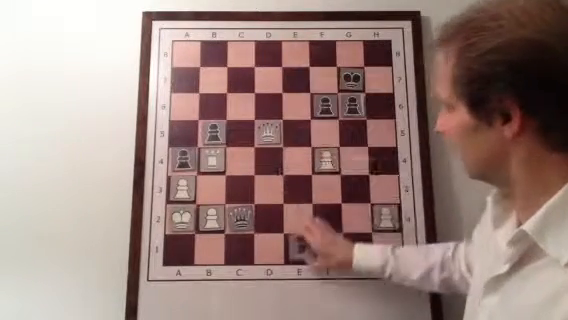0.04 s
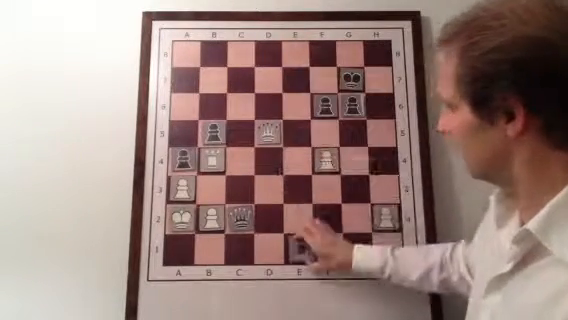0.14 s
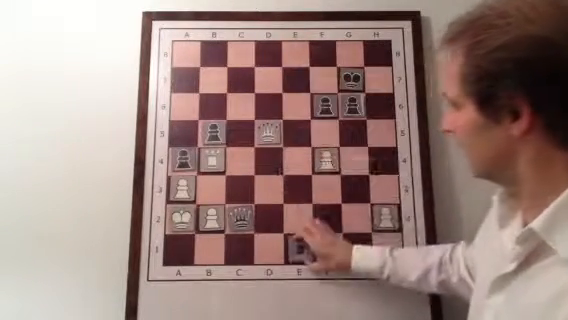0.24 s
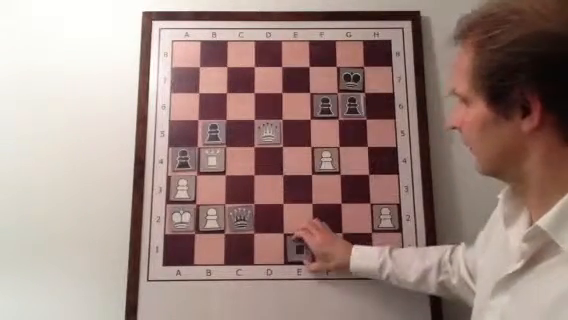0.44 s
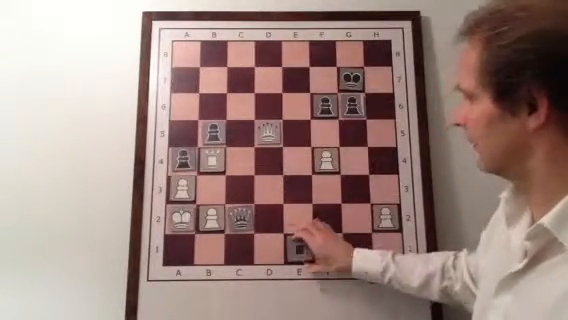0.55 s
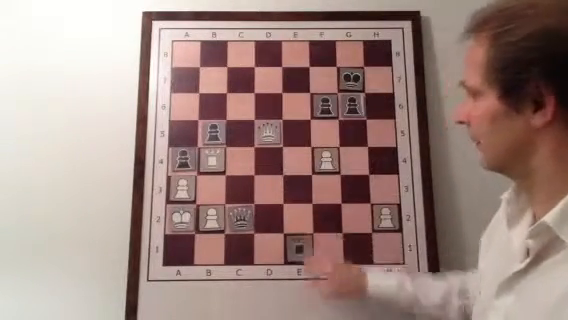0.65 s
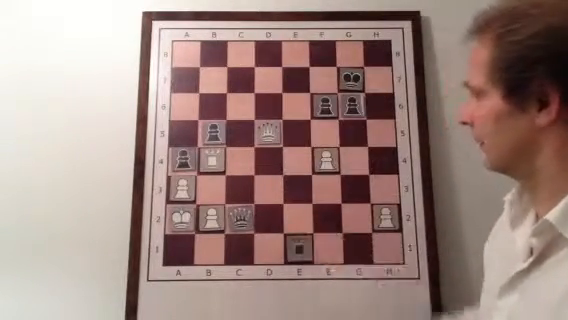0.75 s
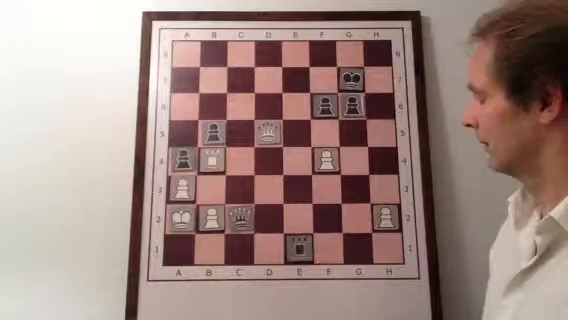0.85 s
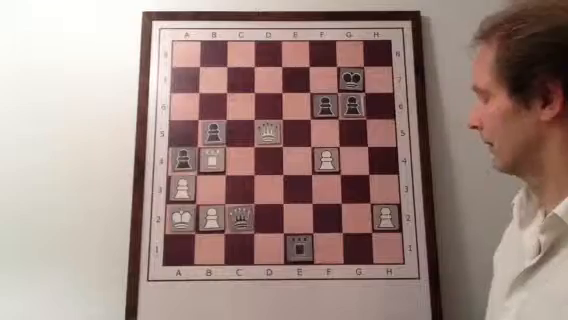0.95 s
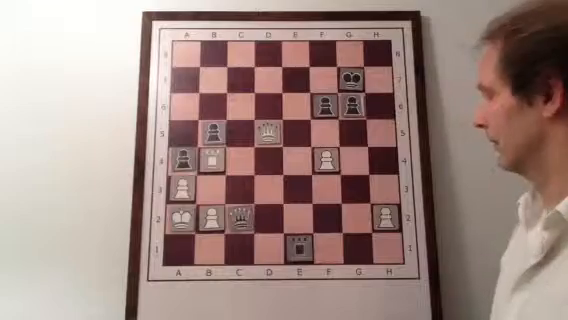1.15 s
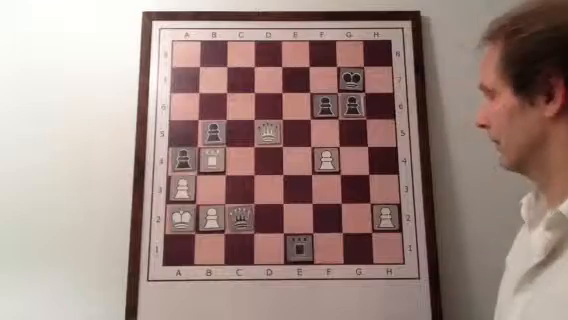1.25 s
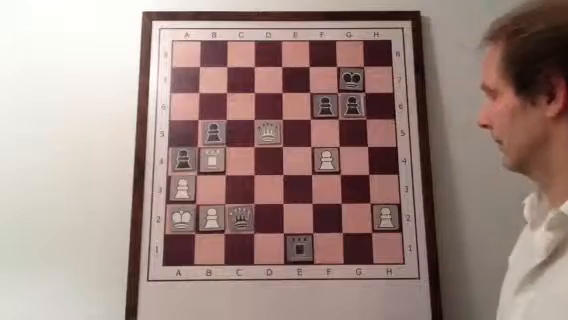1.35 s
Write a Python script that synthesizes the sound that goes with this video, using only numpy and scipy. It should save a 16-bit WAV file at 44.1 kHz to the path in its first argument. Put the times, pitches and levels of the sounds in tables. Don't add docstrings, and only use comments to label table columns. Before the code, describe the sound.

A magnetic game piece clicks sharply onto a thin wall-mounted board with a low hollow knock, then a softer, duller knock as the hand leaves and faint thuds against the wall, close microphone, bare quiet room.

```python
import sys
import numpy as np
from scipy import signal
from scipy.fft import rfft, irfft
from scipy.io import wavfile

SR = 44100
rng = np.random.default_rng(int(sys.argv[2]) if len(sys.argv) > 2 else 0)


def unload_wav(signal):
    wavfile.write(
        sys.argv[1],
        SR,
        np.round(np.clip(np.atleast_2d(signal).T, -1, 1) * 32767).astype(np.int16),
    )


def volts_from_decibels(level):
    exponent = np.asarray(level, float) / 20
    return 10 ** exponent


N = 61739
T = np.arange(N) / SR


def rms_one(x):
    return x / np.sqrt(np.mean(x ** 2) + 1e-20)


def at_hz(points, hz):
    table_hz, value = np.transpose(points)
    return np.interp(np.log(np.maximum(hz, 1)), np.log(table_hz), value)


def coloured(spectrum):
    hz = np.arange(N // 2 + 1) * SR / N
    gain = volts_from_decibels(at_hz(spectrum, hz)) * (hz < spectrum[-1][0])
    return rms_one(irfft(rfft(rng.standard_normal(N)) * gain, N))


def highpass(x, order, hz):
    return signal.sosfilt(signal.butter(order, hz, "high", fs=SR, output="sos"), x)


# time in seconds, level in dB.
RUMBLE_LEVEL = [(0.0, -60), (0.096, -63), (0.59, -63), (0.728, -55.5), (0.778, -55), (0.918, -64),
                (1.4, -65)]
# frequency in Hz, density in dB per Hz.
RUMBLE_COLOUR = [(60, -43), (130, -19), (165, -11.5), (210, 1), (265, -3.5), (340, -7.5), (550, -13.5),
                 (1000, -28.5)]
# frequency in Hz, density in dB per Hz.
HISS_COLOUR = [(25, -17), (85, -15.5), (100, 3), (140, -4), (500, -0.5), (1000, -3), (2000, -7.5),
               (16000, -13)]
HISS_DB, HUM_DB, HUM_HZ = -65.5, -89.5, 100


def background():
    rumble = volts_from_decibels(np.interp(T, *np.transpose(RUMBLE_LEVEL))) * coloured(RUMBLE_COLOUR)
    hum = volts_from_decibels(HUM_DB) * np.sqrt(2) * np.sin(2 * np.pi * HUM_HZ * T)
    return rumble + hum + volts_from_decibels(HISS_DB) * coloured(HISS_COLOUR)


# frequency in Hz, time to fall 60 dB in seconds.
ROOM_DECAY = [(200, 0.25), (500, 0.37), (1000, 0.64), (3500, 0.43), (6000, 0.34), (12000, 0.075)]
ROOM_DB, ROOM_GAP_S, ROOM_BUILD_S = -34, 0.001, 0.002


def room(x):
    age = T[:SR // 2]
    edges = 100 * 2 ** np.arange(0, 7.6, .5)
    tail = np.zeros(len(age))
    for lo, hi in zip(edges, edges[1:]):
        band = signal.butter(2, [lo, hi], "band", fs=SR, output="sos")
        noise = signal.sosfilt(band, rng.standard_normal(len(age)))
        tail += noise * volts_from_decibels(-60 * age / at_hz(ROOM_DECAY, np.sqrt(lo * hi)))
    tail *= 1 - np.exp(-np.maximum(age - ROOM_GAP_S, 0) / ROOM_BUILD_S)
    return volts_from_decibels(ROOM_DB) * signal.fftconvolve(x, tail)[:N]


# centre in seconds, width in seconds, level in dB.
BRUSHES = [
    (.01, 0.037, -69),
    (.408, 0.03, -57),
    (1.165, 0.022, -66.5),
    (1.4, 0.017, -64.5),
]
# frequency in Hz, density in dB per Hz.
CLOTH_COLOUR = [(150, -37), (600, -1.5), (1400, 1), (2500, 1.7), (4000, -1.5), (7000, -11.5), (16000, -15)]


def sleeve():
    swells = sum(volts_from_decibels(db) * np.exp(-((T - s) / width) ** 2) for s, width, db in BRUSHES)
    return coloured(CLOTH_COLOUR) * swells


# start in seconds, level in dB, pitch in Hz,
# time to fall 60 dB in seconds.
THUDS = [(.003, -47.5, 240, 0.12), (0.33, -41, 224, 0.12), (0.457, -50.5, 228.4, 0.2),
         (0.627, -51.5, 233.4, 0.33), (0.639, -63, 490, 0.31), (.645, -56, 826, .1),
         (.658, -42.5, 215, 0.16), (0.689, -49, 177, 0.23), (.755, -53.5, 215, 0.26),
         (0.789, -52, 259, 0.089), (0.833, -44.5, 213, 0.21), (0.924, -48.5, 218.4, 0.22),
         (1.075, -64, 265, 0.087), (1.158, -52, 316, .08)]
THUD_RISE_S = 0.0027


def thuds():
    out = np.zeros(N)
    for s, db, hz, t60 in THUDS:
        age = np.maximum(T - s, 0)
        swell = volts_from_decibels(db - 60 * age / t60) * (1 - np.exp(-age / THUD_RISE_S))
        out += swell * np.sin(2 * np.pi * hz * age)
    return out


def ring(x, hz, t60):
    r, w = volts_from_decibels(-60 / (t60 * SR)), 2 * np.pi * hz / SR
    return signal.lfilter([0, np.sin(w)], [1, -2 * r * np.cos(w), r * r], x + 1e-18)


def soft(x, hz):
    r = np.exp(-2 * np.pi * hz / SR)
    return signal.lfilter([(1 - r) ** 2], [1, -2 * r, r * r], x + 1e-18)


def strike(modes, times, levels_db, spread_db):
    out = np.zeros(N)
    where = (np.array(times) * SR).astype(int)
    for k, (hz, db, t60) in enumerate(modes):
        clicks = np.zeros(N)
        clicks[where] = volts_from_decibels(np.array(levels_db) + db + spread_db * rng.standard_normal(len(where)))
        sign = -1 if k % 3 == 0 else 1
        out += sign * ring(clicks, hz, t60)
    return out


# start in seconds, tick level in dB, board level in dB, crack level in dB.
CONTACTS = [
    (0.2236, -22, -31, -46),
    (0.5705, -44, -44, -67),
]
# delay in seconds, tick level in dB, board level in dB.
LANDING = [
    (.0001, -2, 0),
    (.0012, -1, -6),
    (.0036, -5, -8),
    (.0105, -7, -14),
    (.0185, -12, -3),
    (.064, -22, -12),
]
# delay in seconds, tick level in dB, board level in dB.
HAND = [
    (.0001, 0, -2),
    (.004, -3, -2),
    (.012, -10, -6),
    (.021, -8, -2),
    (.04, -17, -9),
    (.07, -20, -12),
]
# frequency in Hz, level in dB.
PIECE_MODES = [(1930, -22), (2310, -6), (2660, -10), (3090, -4.5), (3340, -3.5), (3480, -3), (3660, -1),
               (3850, -2.5), (4180, -0.5), (4535, -3.5), (4950, -2), (5350, -11), (5900, -8), (6570, -14)]
# frequency in Hz, level in dB, time to fall 60 dB in seconds.
FREE_BOARD = [(215, -19, 0.12), (243, 2, 0.29), (317, -18.5, 0.38), (353, 5.5, 0.085), (426.4, -3.5, 0.12),
              (464.4, -8, 0.31), (490, -7, 0.13), (660, -4.5, 0.031), (770, -9, 0.11), (840, -12, 0.13),
              (1047, -4.5, 0.037), (1136, -7.5, 0.023), (1240, -20, 0.14), (1540, -8, 0.034)]
# frequency in Hz, level in dB,
# time to fall 60 dB in seconds.
HELD_BOARD = [(240, -8.5, 0.22), (365, -5, 0.18), (393, 9.5, 0.063), (472, 4.5, 0.1), (529.5, -9, 0.11),
              (778, -25, 0.059), (1092, -11.5, .04), (1600, 4, 0.022)]
PIECE_T60_S = .013
BOARD_LAG_S = -.001
BOARD_CONTACT_HZ, TICK_CONTACT_HZ, TICK_FLOOR_HZ = 964, 5800, 2000
CRACK_S, CRACK_CUT_HZ = 0.039, 4030
PRESENCE_HZ, PRESENCE_WIDTH_HZ, PRESENCE_DB = 3420, 500, 0


def crack(s, db):
    decay = (T >= s) * np.exp(-np.abs(T - s) / CRACK_S)
    return volts_from_decibels(db + 15.4) * soft(rng.standard_normal(N), CRACK_CUT_HZ) * decay


def piece_on_board():
    tick, knock = np.zeros(N), np.zeros(N)
    piece_modes = [(hz, db, PIECE_T60_S) for hz, db in PIECE_MODES]
    for contact, board_modes, touches in zip(CONTACTS, [FREE_BOARD, HELD_BOARD], [LANDING, HAND]):
        s, tick_db, board_db, crack_db = contact
        lag, tick_loss, board_loss = np.transpose(touches)
        ticks = strike(piece_modes, s + lag, tick_db + tick_loss - 5.5, spread_db=5.5)
        tick += soft(ticks, TICK_CONTACT_HZ)
        tick += crack(s, crack_db)
        knocks = strike(board_modes, s + BOARD_LAG_S + lag, board_db + board_loss - 5, spread_db=2.5)
        knock += soft(knocks, BOARD_CONTACT_HZ)
    presence = signal.lfilter(*signal.iirpeak(PRESENCE_HZ, PRESENCE_HZ / PRESENCE_WIDTH_HZ, fs=SR), tick)
    tick = volts_from_decibels(-3.5) * (tick + volts_from_decibels(PRESENCE_DB) * presence)
    return highpass(tick, 2, TICK_FLOOR_HZ), knock


BOARD_WET_DB, MIC_CUT_HZ = 3, 175


def scene():
    tick, knock = piece_on_board()
    board = tick + knock + room(tick + volts_from_decibels(BOARD_WET_DB) * knock) + thuds()
    return (highpass(board, 6, MIC_CUT_HZ) + sleeve() + background())[None, :]


def low_pass(x):
    return signal.sosfilt(signal.butter(12, 15390, fs=SR, output="sos"), x)


def record(dry):
    top_cut = signal.ellip(10, .5, 60, 15350, fs=SR, output="sos")
    mix = signal.sosfilt(top_cut, dry)
    return low_pass(mix)


dry = scene()
out = record(dry)
unload_wav(out)
```